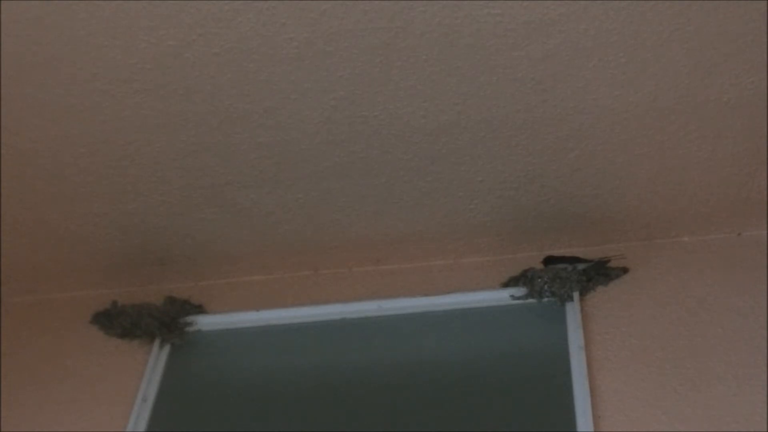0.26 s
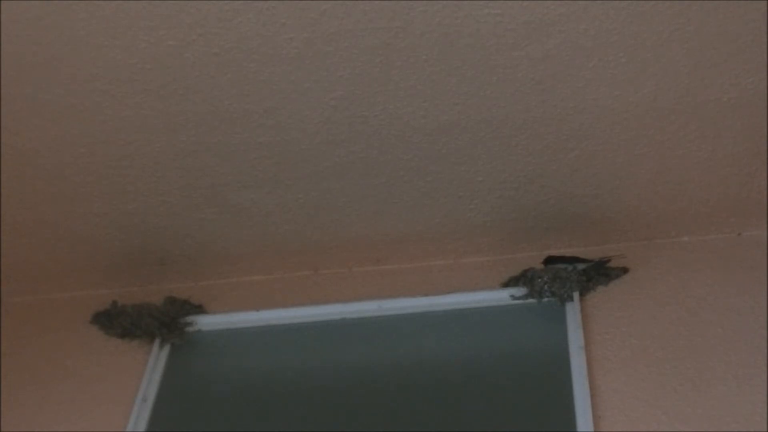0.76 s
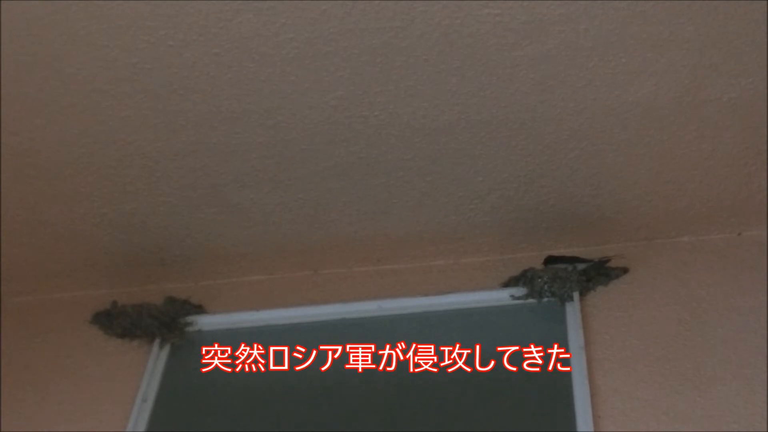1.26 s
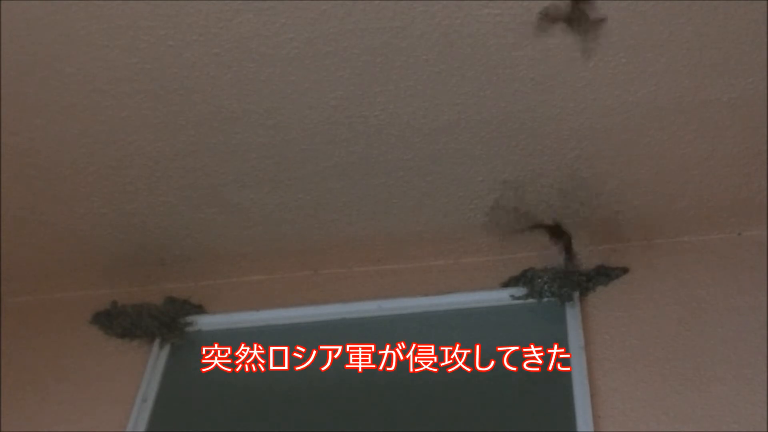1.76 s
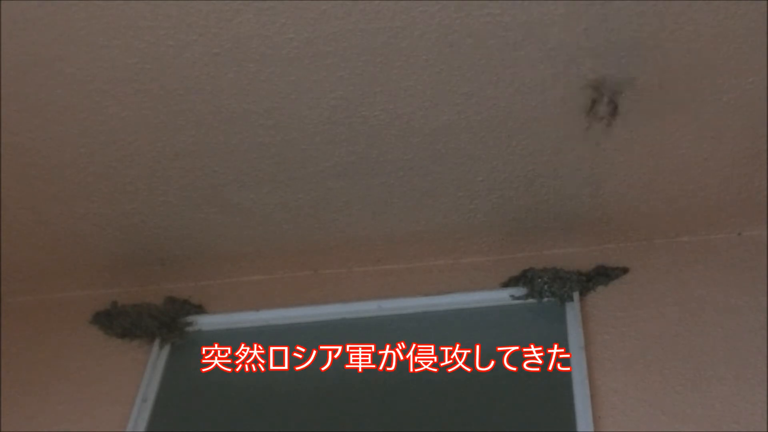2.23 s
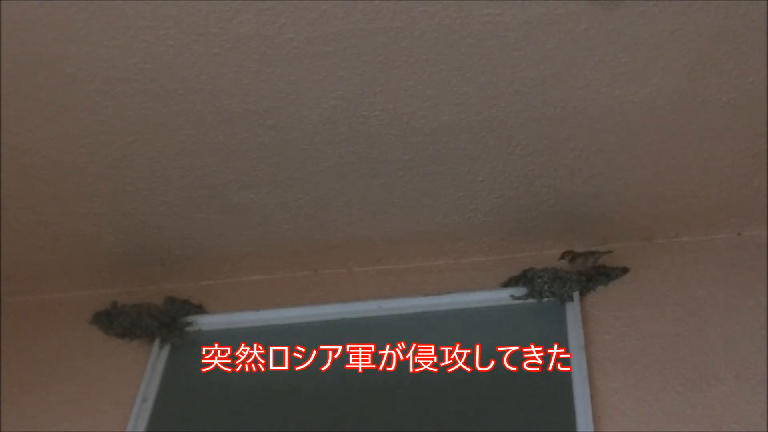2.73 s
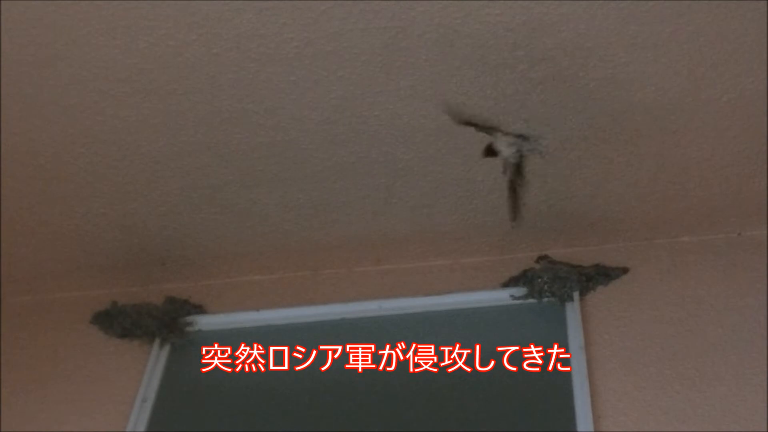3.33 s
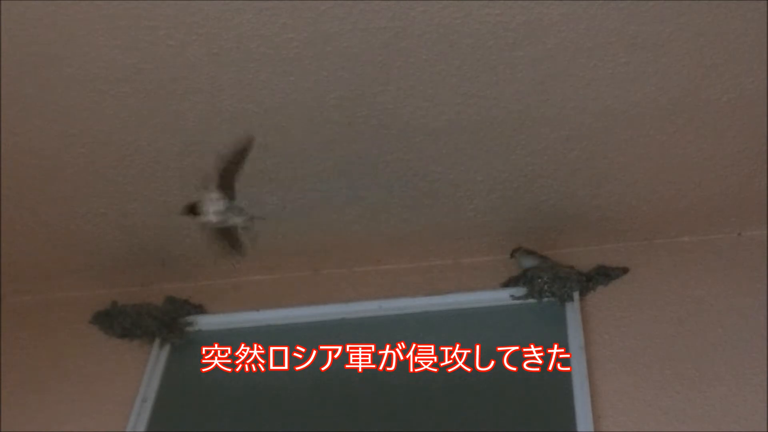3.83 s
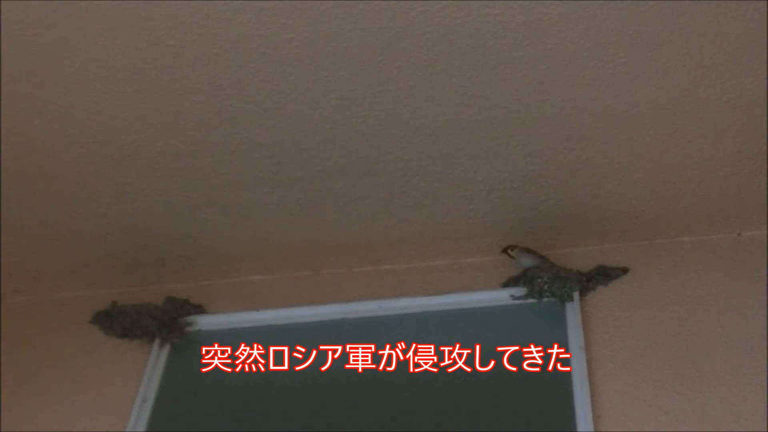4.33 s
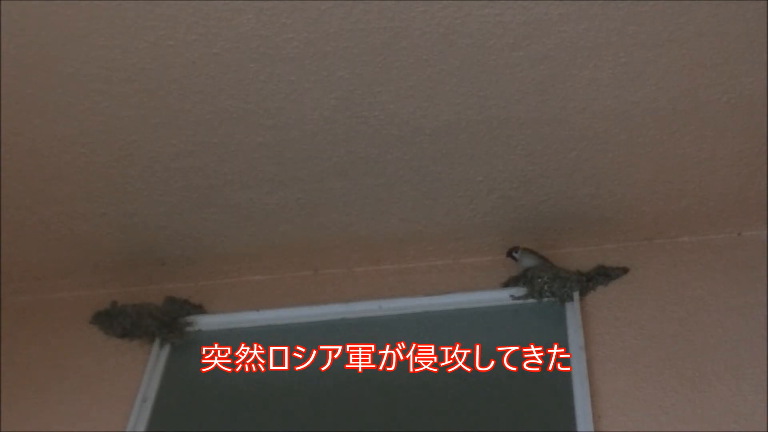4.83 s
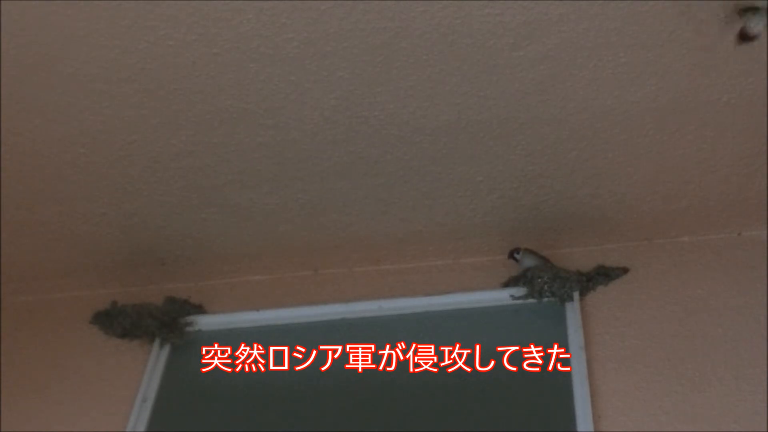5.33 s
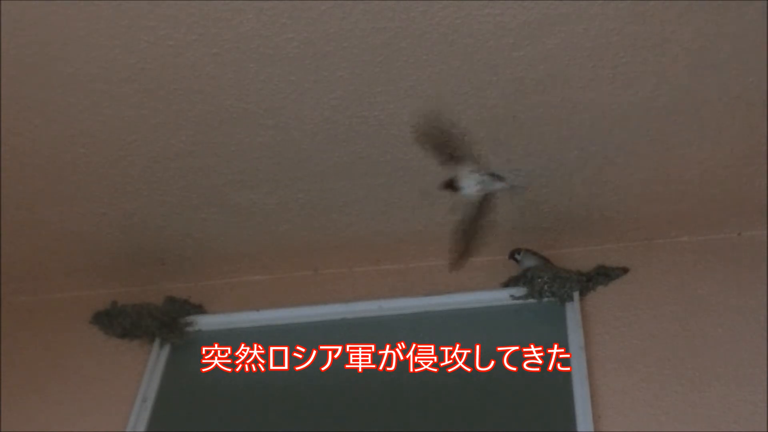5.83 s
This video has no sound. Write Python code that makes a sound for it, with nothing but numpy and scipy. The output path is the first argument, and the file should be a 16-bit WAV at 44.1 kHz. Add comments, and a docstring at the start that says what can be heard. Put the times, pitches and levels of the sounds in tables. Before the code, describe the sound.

A quiet outdoor porch with hard walls, faint steady hiss and low distant traffic. A far vehicle swells at about 0.4 s and fades. Feathers brush softly near 1.3 s, and a quick cluster of gliding, two-toned twitters follows at 1.45-1.57 s. From 1.85 s wings flutter close, in rapid airy puffs with a hollow throb, strongest around 2.0-2.3 s, with more twitters at 2.0-2.1 s. Piercing alarm calls whine and plunge at 2.25 s, the loudest moment, and at 2.44 s, weaker. Dry snaps click at 2.6-2.9 s. Soft slurs and a rising chirp come at 3.0 s, then more upward chirps near 3.35, 3.55, 3.85 and 4.15 s. Faint rustling follows to about 5 s, where a distant vehicle passes slightly. Sharp ticks sound at 5.17 s and one at 5.5 s, then a faint short twitter near 5.6 s as another vehicle approaches far away.

```python
"""Barn swallows around their mud nests under a porch ceiling, with the road some distance off.
A distant vehicle passes, feathers brush and gliding two-voiced tones twitter; then wings flutter by with puffs
of noise, among dry ticks of bills or claws and two alarm calls, a whine breaking into a falling sweep.
Soft "vit" notes rise on arched pitches; late on come faint slurs, a few more ticks and two more vehicles.
Hard walls echo the birds; traffic is shaped noise that swells as vehicles pass, over a steady hiss."""
import sys
import numpy as np
from scipy import signal
from scipy.fft import rfft, irfft, next_fast_len
from scipy.io import wavfile
from scipy.ndimage import uniform_filter1d, map_coordinates

SR = 44100
rng = np.random.default_rng(int(sys.argv[2]) if len(sys.argv) > 2 else 0)


def dump(signal):
    """Clip the signal to [-1, 1] and save it as 16-bit WAV at the path in sys.argv[1]."""
    limited = np.clip(np.atleast_2d(signal).T, -1, 1)
    pcm = np.round(limited * 32767).astype(np.int16)
    wavfile.write(sys.argv[1], SR, pcm)


N = 268128

FADE_S = .003  # the syrinx opens and shuts


def amp(db):
    """Decibels to gain."""
    return 10 ** (np.asarray(db) / 20)


def unit(x):
    """Scale to rms 1."""
    return x / np.sqrt(np.mean(x ** 2) + 1e-20)


def along(points, hz):
    """Read (Hz, value) points on a log frequency axis."""
    f, v = np.transpose(points)
    return np.interp(np.log(hz + 1), np.log(f + 1), v)


def span(length):
    """Times in seconds through a sound, at least 4 ms of them."""
    return np.arange(int(max(length, .004) * SR)) / SR


def wobble(rate, size=N):
    """A smooth random curve, rate knots a second."""
    knots = rng.standard_normal(size // 8)
    return map_coordinates(knots, [np.arange(size) * rate / SR], mode="wrap")


def filtered(x, response):
    """x times a response of frequency."""
    m = next_fast_len(N + 8192)
    return irfft(rfft(x, m) * response(np.fft.rfftfreq(m, 1 / SR)), m)[..., :N]


def noise(spectrum, size=N):
    """Coloured noise of rms 1."""
    gain = amp(along(spectrum, np.fft.rfftfreq(size, 1 / SR)))
    return unit(irfft(rfft(rng.standard_normal(size)) * gain, size))


def diffuse(spectrum):
    """Noise spread between left and right, by mixing a mid and a side noise."""
    # Left-right likeness of the background at each pitch. Each row: frequency in Hz, correlation.
    likeness = [(60, 0.118), (110, 0.38), (200, 0.93), (400, 0.95), (700, 0.96), (1300, 0.94),
                (2400, 0.883), (4400, 0.74), (8000, 1), (12000, .998)]

    def mid_side_gains(hz):
        turn = np.arccos(np.clip(along(likeness, hz), -1, 1)) / 2
        return amp(along(spectrum, hz)) * [np.cos(turn), np.sin(turn)]

    mid, side = filtered(rng.standard_normal((2, N)), mid_side_gains)
    return unit(np.array([mid + side, mid - side]))


def add(track, start, sound):
    """Mix a stereo sound into the track at start seconds."""
    i = max(round(start * SR), 0)
    track[:, i:i + sound.shape[1]] += sound[:, :max(N - i, 0)]


def porch(x, wet_db, walls_db, side_db=-12, build=0.0065, count=6):
    """Direct sound, a few near-wall echoes and a tail, with paths drawn afresh for each sound."""
    # How long the porch rings. Each row: frequency in Hz, time to decay by 60 dB in s.
    decay = [(200, 1), (1500, 0.34), (3500, 0.35), (6000, 0.3), (10000, 0.23), (15000, 0.17)]
    hz, t, z = signal.stft(rng.standard_normal((2, SR // 2)), SR, nperseg=256)
    fall = amp(-60 * t / along(decay, hz)[:, None])
    onset = 1 - np.exp(-t / build)
    tail = signal.istft(z * fall * onset, SR, nperseg=256)[1]
    mid, side = amp(wet_db) * tail / np.linalg.norm(tail[0])
    side = amp(side_db) * uniform_filter1d(side, size=3)
    delays = rng.uniform(.0005, .011, count)  # s
    mid[(delays * SR).astype(int)] += amp(walls_db) * rng.choice([-1, 1], count) / np.sqrt(count)
    mid[0] += 1  # direct sound
    return signal.fftconvolve(x[None], np.array([mid + side, mid - side]), axes=1)


def syrinx(pitch, db, octave_db, rasp_db, jitter=0.016, flutter_db=3.0, third_db=-17):
    """A membrane gliding in pitch with a fast quiver; rasp makes its cycles uneven and smears the line."""
    size, edge = len(pitch), int(FADE_S * SR)
    quivering = pitch * (1 + jitter * wobble(609, size))
    phase = 2 * np.pi * np.cumsum(quivering) / SR + amp(rasp_db) * wobble(2200, size)
    to_nearest_end = np.minimum(np.arange(size), np.arange(size)[::-1])
    opening = np.clip(to_nearest_end / max(edge, 1), 0, 1)
    roughness = 1 + amp(rasp_db) * wobble(2200, size) / 2
    strength = amp(db + flutter_db * wobble(319, size)) * opening * roughness
    overtones = amp(octave_db) * (np.sin(2 * phase) + amp(third_db) * np.sin(3 * phase))
    return np.sqrt(2) * strength * (np.sin(phase) + overtones)


def outside():
    """Distant vehicles swell and fade with their distance, over steady traffic and a faint hiss."""
    # Vehicles going by. Each row: s when nearest, s to half power, rumble in dB, tyre noise in dB.
    passes = [(.38, 0.5, -56, -46.5), (4.98, 0.19, -60.5, -61), (5.95, .35, -61, -57)]
    # Colours of rumble, tyre noise and hiss. Each row: frequency in Hz, level in dB.
    rumble_colour = [(25, -22), (95, -22), (130, -10), (165, -15.5), (210, -6), (300, -1), (500, 4),
                     (700, -0.5), (1100, -11.5), (2500, -57)]
    tyre_colour = [(300, -38), (600, -3), (900, 1.5), (1250, -2.5), (1800, -6.5), (2600, -14),
                   (3800, -23.5), (5100, -24.5), (6500, -41), (9000, -73.5)]
    hiss_colour = [(100, 1.5), (2000, 3.5), (4000, -0.5), (6500, -2), (10000, -4), (13000, -7),
                   (16000, -10.5)]
    far_rumble_db, far_tyres_db = -59, -58  # the steady traffic behind them
    t = np.arange(N) / SR
    power = amp([[far_rumble_db], [far_tyres_db]]) ** 2
    for s, width, rumble_db, tyre_db in passes:
        power = power + amp([[rumble_db], [tyre_db]]) ** 2 / (1 + ((t - s) / width) ** 2)
    rumble = np.sqrt(power[0]) * amp(0.66 * wobble(6.0)) * diffuse(rumble_colour)
    tyres = np.sqrt(power[1]) * amp(0.17 * wobble(5.05)) * diffuse(tyre_colour)
    return rumble + tyres + amp(-62.5) * diffuse(hiss_colour)


def wings():
    """A bird flutters near and away, each wingbeat a puff of air; soft noise brushes in short bouts."""
    # Feathers brushing, and short noisy puffs around the ticks near 2.63 and 2.89 s.
    # Each row: s at full strength, length in s, level in dB.
    rustles = [(1.31, 0.11, -66.5), (1.44, 0.23, -58), (1.853, .19, -54.5), (2.034, 0.02, -43),
               (2.08, .21, -49), (2.308, 0.12, -52.5), (2.622, .015, -51), (2.68, 0.14, -60.5),
               (2.893, 0.012, -59.5), (4.287, 0.52, -67), (4.74, 0.35, -64)]
    # Colours of the wingbeats and of the brushing. Each row: frequency in Hz, level in dB.
    whoosh_colour = [(60, -52), (110, -28), (175, -15), (270, -7.5), (400, -5), (600, 1), (800, 0),
                     (1500, -6.5), (3000, -11.5), (6000, -51)]
    rustle_colour = [(100, -45), (400, -36), (1000, 6), (2500, 4.5), (5000, 0), (8000, 1), (10500, -3),
                     (13000, -7), (16000, -11)]
    nearest_s, nearest_db = 2.26, -45
    approach_db_per_s, recede_db_per_s = 26, 31
    wingbeat_hz = 12
    attack_s, release_s = 0.025, 0.051
    t = np.arange(N) / SR
    beat = np.sin(2 * np.pi * np.cumsum(wingbeat_hz + 2 * wobble(5.29)) / SR)
    away_db = np.maximum(approach_db_per_s * (nearest_s - t), recede_db_per_s * (t - nearest_s))
    air = amp(nearest_db - away_db + 3.3 * beat) * noise(whoosh_colour)
    bouts = []
    for s, length, db in rustles:
        attack = np.clip((t - s) / attack_s + 1, 0, 1)
        release = np.exp(-np.maximum(t - s - length, 0) / release_s)
        bouts.append(amp(db) * attack * release)
    brush = np.max(bouts, axis=0) * amp(beat + 1.2 * wobble(30))
    brushing = brush * unit(noise(rustle_colour) * amp(1.9 * wobble(350)))
    return porch(air + brushing, wet_db=-14.0, walls_db=-12.5)[:, :N]


def hollows():
    """Narrow, wavering resonances that swell and die as the wings pass."""
    # The flutter rings hollow close to the ceiling.
    # Each row: s at the middle, spread in s (standard deviation), pitch in Hz, level in dB.
    resonances = [(1.975, 0.033, 516, -50.5), (2.257, 0.09, 538, -50), (2.365, 0.073, 285, -54)]
    waver = 70  # knots a second; faster is wider in pitch
    t, out = np.arange(N) / SR, np.zeros(N)
    for s, spread, hz, db in resonances:
        phase = 2 * np.pi * hz * t
        ring = unit(wobble(waver) * np.sin(phase) + wobble(waver) * np.cos(phase))
        out += amp(db) * np.exp(-((t - s) / spread) ** 2 / 2) * ring
    return out


def ticks():
    """Hard little snaps of bills or claws: noise with a sharp attack and a decay of a few milliseconds."""
    # Each row: start in s, level in dB before halving, lower click in dB relative to the high one.
    snaps = [(2.040, -45, -8), (2.6043, -43, -2), (2.627, -38, -7), (2.630, -31.5, -8.5), (2.636, -38, -15),
             (2.8002, -38, -19), (2.887, -41, -12), (3.053, -51, -2), (3.182, -49, -13), (3.453, -50, -4),
             (5.1685, -36.5, -8), (5.170, -38.5, 1), (5.187, -47, -14), (5.4933, -44.5, -16)]
    # Colours of the high and the lower click. Each row: frequency in Hz, level in dB.
    high_colour = [(300, -55), (3000, -41), (5500, -9), (7500, 4), (10500, 3.5), (13000, -8), (16000, -5)]
    low_colour = [(200, -47.5), (1200, -24), (2500, -1), (3800, -11), (5400, 11), (6800, -8), (11000, -11),
                  (15500, -11)]
    attack_s, t60_s = 0.000174, 0.0062
    out, t = np.zeros((2, N)), np.arange(128) / SR
    shape = (1 - np.exp(-t / attack_s)) * amp(-60 * t / t60_s)
    for s, db, low_db in snaps:
        high = unit(shape * noise(high_colour, len(t)))
        low = amp(low_db) * unit(shape * noise(low_colour, len(t)))
        add(out, s, porch(amp(db) * (high + low) / 2, wet_db=-5, walls_db=-8.5))
    return out


def slurs():
    """Each slur bends smoothly through three pitches and is softer at its ends."""
    # Twittered slurs, overlapping where both sides of the syrinx sound.
    # Each row: start in s, length in s, first, middle and last pitch in Hz, level in dB,
    # swell over its length in dB, octave in dB relative to the tone, rasp in dB.
    twitter = [ (1.456, 0.021, 4410, 4080, 2950, -41, -4, -12.5, -18),
               (1.501, 0.017, 2050, 2420, 2650, -39.5, -3, -18, -14),
               (1.526, .045, 2696, 2484, 1460, -35.5, -4, -17, -13),
               (1.547, .022, 4850, 4480, 3250, -36.5, 4, -25, -16),
               (1.97, 0.03, 4500, 4080, 3500, -44.5, 0, -2.5, -11),
               (2.031, 0.039, 2760, 2850, 2780, -36.5, 4, -21, -16),
               (2.068, .040, 2714, 2330, 1726, -35.5, -3, -7.5, -14),
               (2.09, .033, 4360, 2950, 2360, -41, -7, -20, -5),
               (2.973, 0.029, 1670, 1839, 1840, -46, 3, -24, -8),
               (2.982, 0.015, 1950, 2784, 3400, -50, 4, -26, -13),
               (3.034, 0.052, 3460, 3780, 4520, -47.5, 2, -21.5, -17),
               (3.511, 0.033, 1926, 2090, 2080, -53, -10, -20, -8),
               (4.702, .025, 4220, 5680, 6290, -64, -5, -25, 0.5),
               (5.572, 0.0553, 4420, 4440, 4280, -50.5, 15, -16, -0.5),
               (5.598, .029, 3600, 4720, 4115, -50, -4, -6, -13),
               (5.631, 0.021, 3700, 3570, 3500, -43, 5, -11.5, -8),
               (5.655, 0.0277, 3450, 3230, 3000, -45.5, -7, -30, -8)]
    edge_db = 9.5  # loss at the ends
    out = np.zeros((2, N))
    for s, length, first, middle, last, db, swell_db, octave_db, rasp_db in twitter:
        u = np.linspace(-1, 1, len(span(length + FADE_S)))
        pitch = middle + (last - first) / 2 * u + ((first + last) / 2 - middle) * u ** 2
        level_db = db + swell_db * u / 2 - edge_db * u ** 2
        tone = syrinx(pitch, level_db, octave_db, rasp_db, jitter=.012, flutter_db=3.0)
        add(out, s - FADE_S / 2, porch(tone, wet_db=-3.0, walls_db=-6.0))
    return out


def arch(t):
    """Height 0-1 of a vit note's pitch at t seconds from its top."""
    rise_s, fall_s, roundness = .025, 0.041, 1.7
    return np.exp(-np.abs(t / np.where(t < 0, rise_s, fall_s)) ** roundness)


def vits():
    """A reedy lead-in climbs to a pure arch; the other side of the syrinx joins below it."""
    # Each row: s of the top, rise in s, fall in s, low and top pitch in Hz, lead-in, top and
    # second-voice levels in dB, lead-in octave in dB relative to the tone.
    notes = [ (3.002, .072, .028, 2506, 4790, -54, -45.5, -41, 7.5),
             (3.353, 0.071, 0.015, 2800, 5030, -50, -59.5, -52.5, -9),
             (3.559, 0.055, 0.027, 2760, 5100, -50, -50, -47.5, 0.5),
             (3.841, .050, 0.02, 2700, 4990, -51.5, -53.5, -53, -10),
             (4.137, 0.053, 0.0059, 2794, 5030, -47, -51, -54, -12)]
    pure_db = -27  # octave at the top of the arch
    lead_rasp_db, top_rasp_db = -8.5, -22  # harsh at first, clean at the top
    soft_db, soft_s = 8, .007  # the lead-in swells from this far below
    second_ratio, second_lag_s, second_lead_s = .735, 0.00797, .018  # pitch share, lag, entry before the top
    second_swell_db = 7  # it grows louder toward its end
    out = np.zeros((2, N))
    for s, rise, fall, low, top, lead_db, top_db, second_db, octave_db in notes:
        t = span(rise + fall + FADE_S)
        height = arch(t - rise)
        purity = np.sqrt(height)
        db = lead_db + (top_db - lead_db) * height - soft_db * np.exp(-t / soft_s)
        lead_octave_db = octave_db + (pure_db - octave_db) * purity
        rasp_db = lead_rasp_db + (top_rasp_db - lead_rasp_db) * purity
        pitch = low + (top - low) * height
        lead = syrinx(pitch, db, lead_octave_db, rasp_db, jitter=0.017, flutter_db=2.5)
        add(out, s - rise, porch(lead, wet_db=-4.5, walls_db=-3.5))

        height = arch(span(second_lead_s + fall + FADE_S) - second_lead_s - second_lag_s)
        pitch = second_ratio * (low + (top - low) * height)
        db = second_db + second_swell_db * np.linspace(-1, 0, len(height))
        second = syrinx(pitch, db, octave_db=-28, rasp_db=-19, jitter=0.017, flutter_db=-1.5)
        add(out, s - second_lead_s, porch(second, wet_db=-3, walls_db=1.0))
    return out


def alarms():
    """A high wavering whine, then a sudden loud sweep that falls ever faster."""
    # Sharp alarm calls. Each row: s of the break, whine length in s, whine level in dB, whine octave in dB
    # relative to it, first and last plunge pitch in Hz, plunge level in dB, plunge octave in dB relative to it.
    calls = [(2.2555, .098, -40, -13, 4850, 2650, -23.5, -29),
             (2.4410, .092, -42, -8, 4650, 2950, -31.5, -20)]
    # The whine of every call. Each row: share of its length, pitch in Hz, dB added to the whine level.
    whine_path = [(0, 6670, -10), (.09, 5900, 5), (.22, 5080, -5.5), (.39, 5020, -3), (.56, 5640, -9.5),
                  (.8, 5340, 1), (1, 5150, 5)]
    plunge_s, bend, fade_db = .027, 1.6, 8  # length, steepening, loss at the bottom
    shares, pitches, swells = np.transpose(whine_path)
    out = np.zeros((2, N))
    for s, length, whine_db, whine_octave_db, first, last, db, octave_db in calls:
        share = span(length) / length
        pitch = np.interp(share, shares, pitches)
        swell_db = np.interp(share, shares, swells)
        whine = syrinx(pitch, whine_db + swell_db, whine_octave_db, rasp_db=-10)
        add(out, s - length, porch(whine, wet_db=-2, walls_db=-9.5))

        u = span(plunge_s + FADE_S) / (plunge_s + FADE_S)
        pitch = first + (last - first) * u ** bend
        plunge = syrinx(pitch, db - fade_db * u ** 2, octave_db, rasp_db=-15, flutter_db=1.5)
        add(out, s - FADE_S / 2, porch(plunge, wet_db=-2.5, walls_db=-3.0))
    return out


def scene():
    """The birds under the roof and the street beyond, a touch louder on the right."""
    birds = wings() + hollows() + ticks() + slurs() + vits() + alarms()
    return (outside() + birds) * amp([[-.15], [.15]])


def record(dry):
    """The recorder keeps nothing above its band limit."""
    top_hz = 15800
    return filtered(dry, lambda hz: hz < top_hz)


dry = scene()
out = record(dry)
dump(out)
```